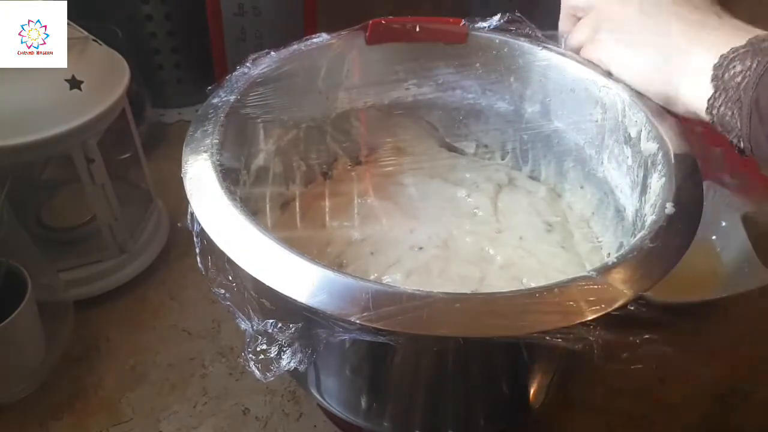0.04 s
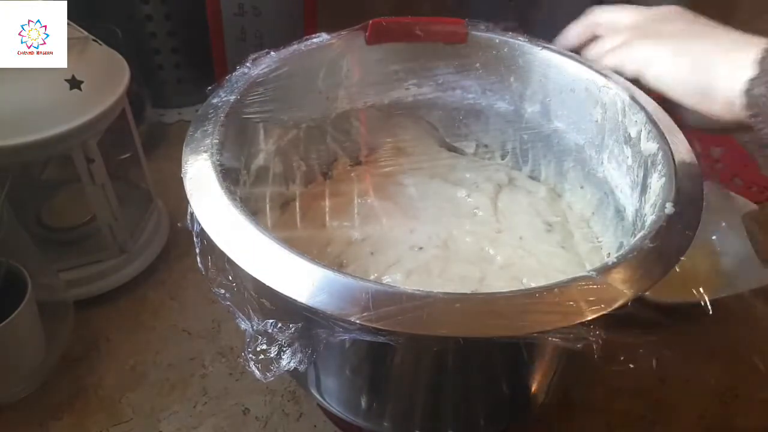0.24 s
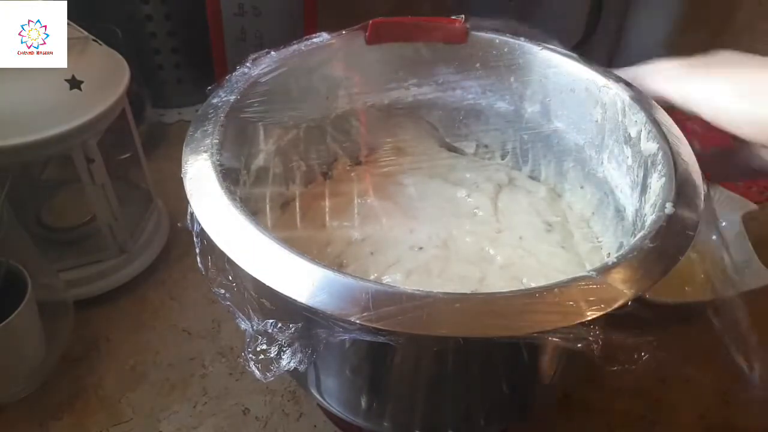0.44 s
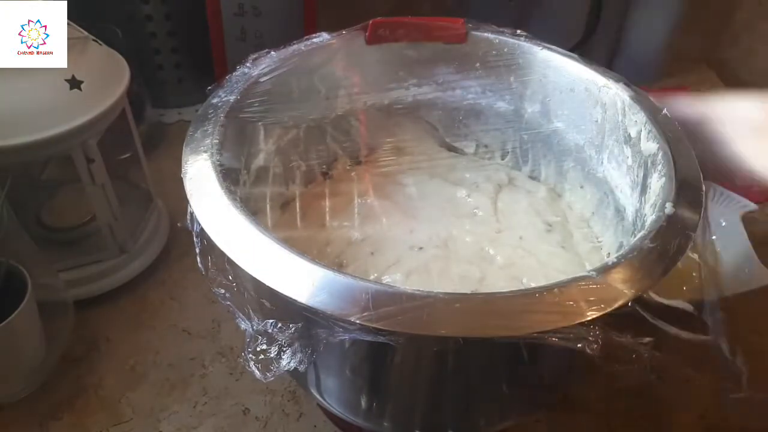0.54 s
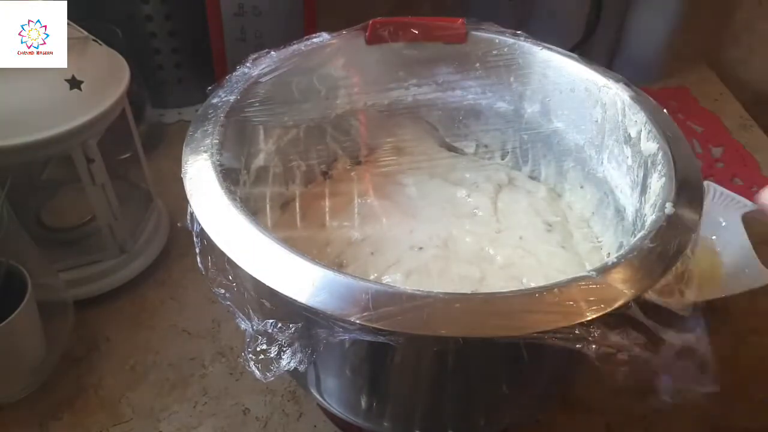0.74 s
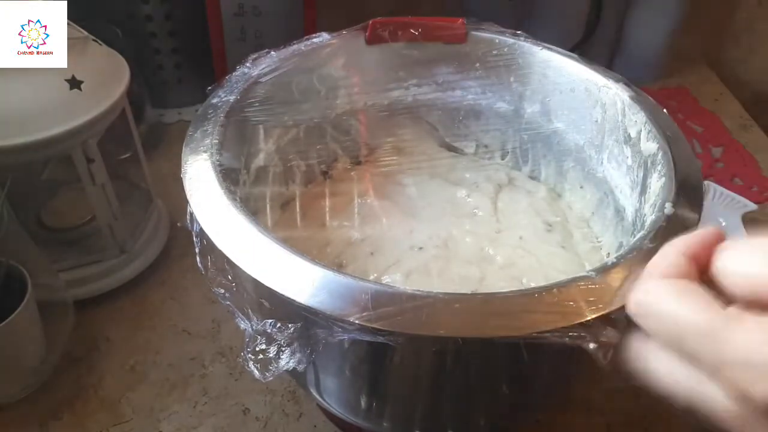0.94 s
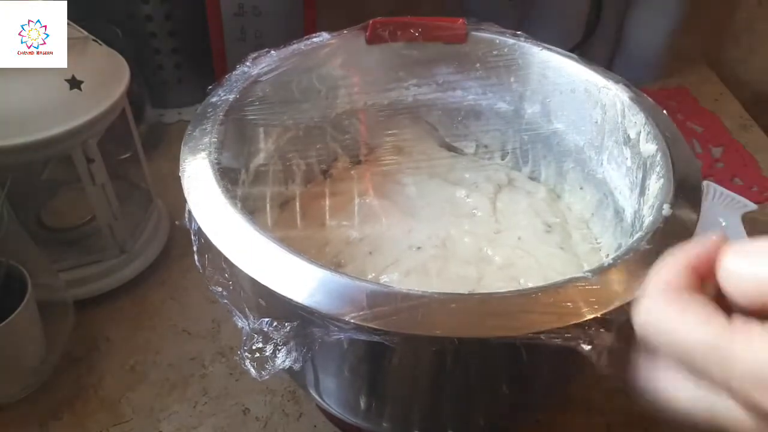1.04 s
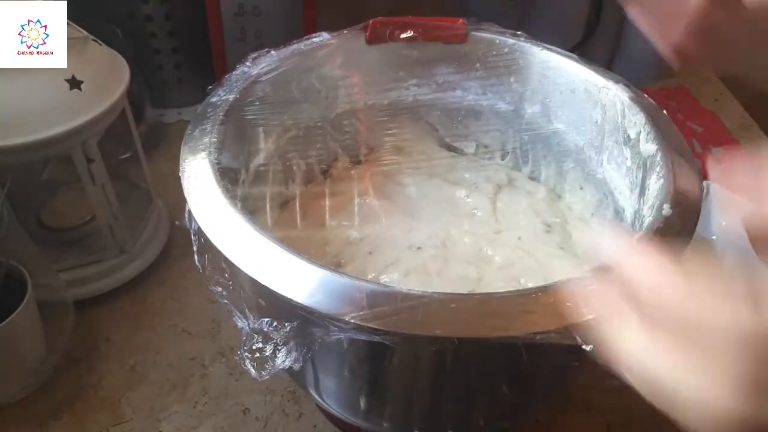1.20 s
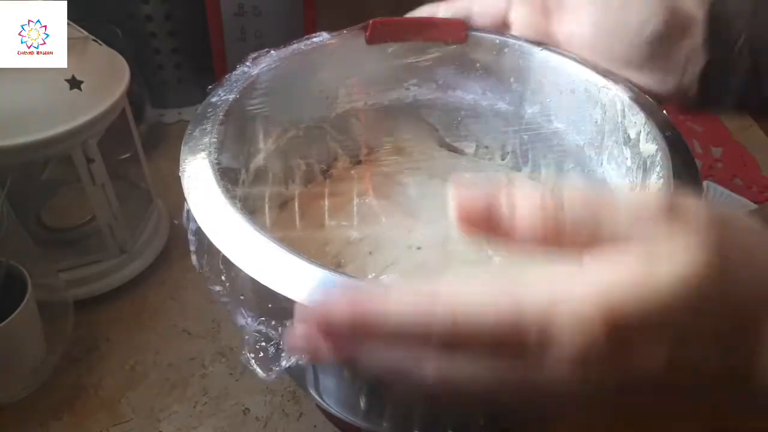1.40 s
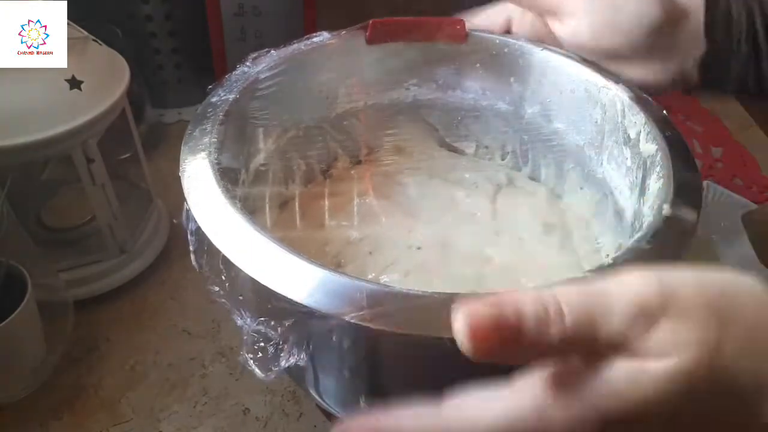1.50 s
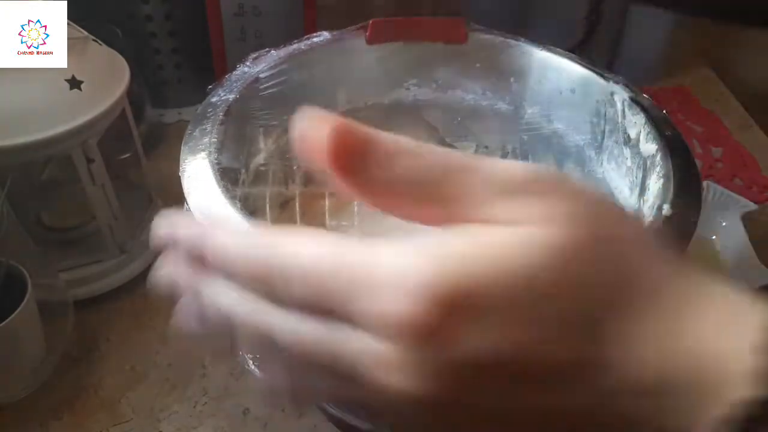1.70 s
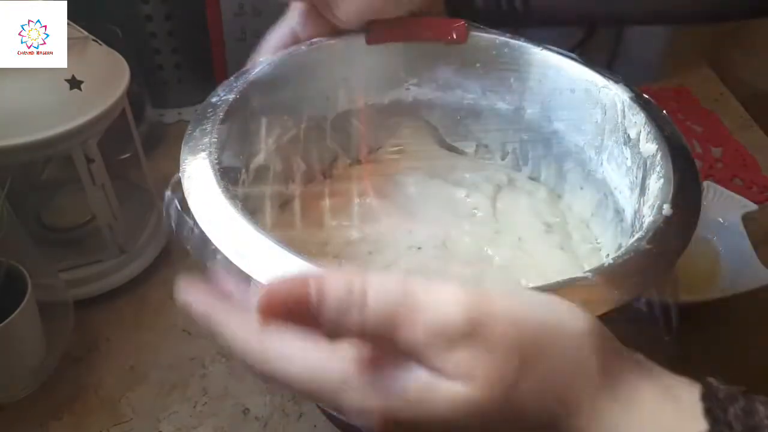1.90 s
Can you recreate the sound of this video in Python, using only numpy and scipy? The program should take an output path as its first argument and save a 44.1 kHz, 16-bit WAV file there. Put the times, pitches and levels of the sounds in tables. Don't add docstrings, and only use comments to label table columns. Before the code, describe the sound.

Close phone recording of plastic wrap being pressed over a metal bowl: crinkling strokes, an early thudding boom, clattery knocks, light taps, then brighter rustles and short rim squeaks, slight room echo, low distant hum.

```python
import sys
import numpy as np
from scipy import signal
from scipy.fft import rfft, irfft, next_fast_len
from scipy.io import wavfile
from scipy.ndimage import map_coordinates

SR = 44100
rng = np.random.default_rng(int(sys.argv[2]) if len(sys.argv) > 2 else 0)


def makeup_ratio(level_db):
    decades = np.asarray(level_db, float) / 20
    return 10 ** decades


def log_audio(samples):
    frames = np.atleast_2d(samples).T
    limited = np.clip(frames, -1, 1)
    pcm = np.round(limited * 32767).astype(np.int16)
    wavfile.write(sys.argv[1], SR, pcm)


N = 85995
T = np.arange(N) / SR
ON_RIM_S, OFF_RIM_DB = 0.69, -20
KNOCK_PAN_DB = -2.5


def unit(x):
    return x / np.sqrt(np.mean(x ** 2) + 1e-20)


def along(points, hz):
    f, v = np.transpose(points)
    return np.interp(np.log(hz + 1), np.log(f + 1), v)


def curves(rows):
    s, *columns = np.transpose(rows)
    return [np.interp(T, s, column) for column in columns]


def wobble(rate_hz):
    knots = rng.standard_normal(int(N * rate_hz / SR) + 4)
    return map_coordinates(knots, [T * rate_hz])


def filtered(x, response):
    m = next_fast_len(N + SR // 2)
    return irfft(rfft(x, m) * response(np.fft.rfftfreq(m, 1 / SR)), m)[..., :N]


def coloured(x, spectrum):
    return unit(filtered(x, lambda hz: makeup_ratio(along(spectrum, hz))))


def modes(x, table):
    t = T[:SR // 2]
    ring = np.zeros(len(t))
    for k, (hz, db, t60) in enumerate(table):
        ring += (-1) ** k * makeup_ratio(db - 60 * t / t60) * np.sin(2 * np.pi * hz * t)
    return signal.fftconvolve(x, ring)[:N]


def pair(alike):
    a, b = rng.standard_normal((2, N))
    angle = np.arccos(np.clip(alike, 0, 1)) / 2
    common, side = np.cos(angle) * a, np.sin(angle) * b
    return np.array([common + side, common - side])


def pan(db):
    return makeup_ratio(np.multiply.outer([.5, -.5], np.atleast_1d(db)))


def dying(t, t60, rise_s):
    return makeup_ratio(-60 * t / t60) * (1 - np.exp(-np.abs(t) / rise_s))


def place(rows, shape, before=0):
    lead, margin = round(before * SR), SR // 2
    out = np.zeros((2, N + SR))
    t = np.arange(-lead, round(.3 * SR)) / SR
    for s, *row in rows:
        at = int(s * SR)
        first = at + margin - lead
        out[:, first:][:, :len(t)] += shape(t + at / SR - s, *row)
    return out[:, margin:margin + N]


# time in seconds, pitch in Hz, level in dB.
DRONE_TRACK = [(0, 54, -57.5), (.6, 60.15, -66), (.72, 60.7, -48.5), (1.27, 64.55, -46.5),
               (1.39, 64.4, -59.5), (1.7, 65.3, -64), (1.8, 67.8, -56), (1.95, 66, -57.5)]
# frequency in Hz, density in dB per Hz.
AIR_SPECTRUM = [(15, -61), (25, -63), (45, -2), (70, -6), (137, -1), (373, -26.5), (591, -24),
                (14800, -47.5), (16000, -54)]


def background():
    hz, db = curves(DRONE_TRACK)
    phase = 2 * np.pi * np.cumsum(hz + 1.4 * wobble(9.97)) / SR
    drone = makeup_ratio(db + 6.0 + 2.0 * wobble(12)) * np.sin(phase)
    air = filtered(pair(0.94), lambda f: f < 400) + filtered(pair(0.058), lambda f: f >= 400)
    air_db = -57 + 0.5 * wobble(2.59)
    return drone * pan(-1.6) + makeup_ratio(air_db) * coloured(air, AIR_SPECTRUM)


# frequency in Hz, t60 in seconds.
ROOM_DECAY = [(200, 0.4), (1700, 0.24), (10000, 0.34)]


def kitchen(x):
    hz, t, z = signal.stft(pair(0.46)[:, :SR // 2], SR, nperseg=256)
    decay = makeup_ratio(-60 * t / along(ROOM_DECAY, hz)[:, None])
    tail = signal.istft(z * decay, SR, nperseg=256)[1]
    delayed = np.pad(x, (300, 0))[None]
    return signal.fftconvolve(delayed, tail / np.linalg.norm(tail[0]), axes=1)[:, :N]


# start in seconds, swell in seconds, hold in seconds, hiss in dB, skin drag in dB.
HAND_STROKES = [(-.03, 0.015, 0.067, -54, -41.5), (.035, 0.048, 0.033, -49, -36),
                (.30, 0.0095, 0.018, -57, -65), (.335, 0.013, 0.023, -49, -43.5),
                (.38, 0.012, 0.057, -65, -62), (.48, 0.012, 0.12, -60.5, -61.5),
                (.575, 0.033, 0.061, -55, -60), (.978, 0.0028, 0.0094, -79, -58.5),
                (.988, 0.011, 0.023, -39.5, -39.5), (1.045, 0.0043, 0.0056, -53.5, -46),
                (1.07, 0.019, 0.086, -70, -54), (1.160, 0.0065, 0.028, -42.5, -56),
                (1.405, 0.029, 0.0093, -55.5, -50.5), (1.455, 0.0076, 0.032, -50.5, -47.5),
                (1.50, 0.012, 0.065, -56, -49.5), (1.835, 0.027, 0.052, -50, -49.5),
                (1.89, 0.022, 0.057, -43, -45)]


def rub():
    swell_db, release_t60 = 18.5, 0.083

    def stroke(t, swell_s, hold_s, *db):
        rise = swell_db * np.maximum(1 - t / swell_s, 0)
        release = 60 * np.maximum(t - swell_s - hold_s, 0) / release_t60
        return makeup_ratio(np.reshape(db, (2, 1)) - rise - release)

    return place(HAND_STROKES, stroke)


# time in seconds, peak in dB, pitch in Hz, swell in ms.
AIR_BOOMS = [
    (.2193, -9.5, 293.7, 5),
    (.266, -25.5, 292.4, 12),
    (.283, -29, 286, 5),
    (.243, -27, 432, 4),
    (.787, -34, 515, 6),
    (.145, -42, 510, 7),
]


def booms():
    def boom(t, db, hz, ms):
        return makeup_ratio(db - 4.1 * (t / (ms / 1000)) ** 2) * np.cos(2 * np.pi * hz * t)

    return place(AIR_BOOMS, boom, before=.04) * pan(KNOCK_PAN_DB)


# time in seconds, peak in dB, contact in ms, clatter over it in dB.
BOWL_KNOCKS = [(.133, -41, 0.4, 11), (.2045, -20.5, .8, 12.5), (.2082, -14, 0.43, -4.5),
               (.2151, -23, 0.85, 9.5), (.256, -31, 2.1, 13), (.299, -28.5, 3.5, 5.5),
               (.42, -31.5, 3.5, -7), (1.116, -31, 2.9, -4), (1.468, -27, 7.5, -7), (.470, -18.5, 1.42, 5),
               (.4735, -22, 1.88, 2.5), (.527, -21, 1.28, 6.5), (.556, -25, 2.04, -9),
               (1.481, -31.5, 1.57, 1.5)]
# time in seconds, peak in dB, contact in ms, clatter over it in dB.
FINGER_TAPS = [
    (0.78, -29, 0.2, 14),
    (.791, -28, 1, -6),
    (0.81, -35.5, 1, -6),
    (.836, -43, 0.99, 12),
    (0.996, -36.5, 0.47, 6),
    (1.1136, -28.5, 0.76, -1.5),
    (1.903, -38.5, 0.87, -5),
]
# frequency in Hz, level in dB, t60 in seconds.
BODY_MODES = [(75.7, -20, 0.85), (116, -12.5, 0.33), (175.2, -18.5, 0.38), (197, -18.5, 0.37),
              (283, -17, 0.086), (303.7, 8, 0.05), (420.7, -11.5, 0.29), (513, -9, 0.068),
              (640, -12.5, 0.022), (709, -12, 0.069), (975, -39, 0.099)]
# frequency in Hz, density in dB per Hz.
CLATTER_SPECTRUM = [(150, -14), (300, 0), (550, -6.5), (1000, -14), (2200, -23.5), (3500, -35.5),
                    (7000, -56), (16000, -46)]


def knocks(drag):
    clatter_db, clatter_t60, press_db = -19, 0.14, -26.5

    def knock(t, db, ms, _):
        half_s = ms / 2000
        return makeup_ratio(db) * np.exp(-(t / half_s) ** 2) / (half_s * SR)

    def tap(t, db, ms, over_db):
        return knock(t, db, ms, over_db) * t / (ms / 4000)

    def shake(t, db, ms, over_db):
        return makeup_ratio(db + over_db + clatter_db) * dying(t, clatter_t60, 0.00056)

    push = place(BOWL_KNOCKS, knock, before=0.0055) + place(FINGER_TAPS, tap, before=.005)
    rumble = makeup_ratio(press_db + OFF_RIM_DB * (T < ON_RIM_S)) * drag * rng.standard_normal(N)
    body = makeup_ratio(-6) * modes(push[0] + rumble, BODY_MODES) * pan(KNOCK_PAN_DB)
    clatter = place(BOWL_KNOCKS + FINGER_TAPS, shake) * coloured(pair(0.12), CLATTER_SPECTRUM)
    return body + clatter


# time in seconds, peak in dB, pitch in Hz, swell in ms.
RIM_FLICKS = [(1.003, -36, 2920, 3.9), (1.019, -28, 1834, 3), (1.030, -32.5, 1680, 3.2),
              (1.054, -34, 1850, 2.8), (1.055, -37.5, 2820, 3.5), (1.058, -41, 840, 6.1),
              (1.165, -31, 2900, 1.4), (1.178, -34.5, 2524, 8.7), (1.191, -27, 1656, 2.3),
              (1.431, -42, 1629, 0.72), (1.447, -28, 1728, 1.5), (1.473, -29, 1700, 0.59),
              (1.517, -29, 1777, 2.4), (1.522, -27, 1720, 2.9), (1.546, -40.5, 1650, 2.2),
              (1.558, -29, 1780, 2), (1.5665, -21, 1740, 2.4), (1.573, -34, 1700, 2.3),
              (1.857, -43.5, 1758, 5), (1.882, -36, 1766, 3), (1.201, -38, 1687, 7),
              (1.938, -52, 1720, 2.1), (1.013, -31.5, 2100, 2.2), (1.535, -36, 1870, 6.1),
              (1.913, -33, 2850, 0.76)]
# frequency in Hz, level in dB, t60 in seconds.
RIM_MODES = [(1579, -12, 0.25), (1677, -1, 0.05), (1755, 0, 0.09), (1850, -5, 0.05), (1945, -3, 0.045),
             (2088, -11, 0.12), (2630, -16, 0.05), (840, -29, .1)]


def rim(drag):
    fall_per_s, roughness = 3.63, 0.61
    ring_db, rub_ring_db = -8, -3

    def flick(t, db, hz, ms):
        swell = makeup_ratio(db) * np.exp(-.5 * (t / (ms / 1000)) ** 2)
        return swell * np.sin(2 * np.pi * hz * t * (1 - fall_per_s * t))

    squeak = place(RIM_FLICKS, flick, before=.03)
    squeak = squeak * (1 + roughness * np.array([wobble(500), wobble(500)]))
    hum_db = rub_ring_db + OFF_RIM_DB * (T < ON_RIM_S) + 0.58 * wobble(88)
    hum = drag * makeup_ratio(hum_db) * rng.standard_normal(N) / 25
    ring = makeup_ratio(ring_db) * modes(squeak[0], RIM_MODES) / 130 + modes(hum, RIM_MODES)
    return (squeak + ring) * pan(-1.5 + 3.6 * wobble(14.95))


# time in seconds, peak in dB, left-right in dB, pitch factor.
CREASE_TICKS = [(.0030, -32, 2, 1), (.0115, -36, 2, 1), (.0193, -30, 2, 1), (.0240, -33, 2, 1),
                (.0725, -33, 2, .85), (.0895, -32, 2, .85), (.0970, -33, 2, .9), (.1000, -32, 2, .9),
                (.1055, -33, 2, .95), (.1316, -28, 3, 1), (.3426, -45, 3, 1), (.3601, -36, 3, 1),
                (.5267, -45, 3, 1), (.5896, -48, 3, 1), (.6135, -44, 3, 1), (.7815, -36, 0, .67),
                (.7832, -35, 0, .67), (.9788, -52, 3, 1), (.9968, -34, 4, 1), (1.0025, -32, 3, 1),
                (1.0130, -32, 2, 1), (1.0172, -32, 2, 1), (1.1275, -48, 4, 1), (1.1664, -38, 4, 1.2),
                (1.1820, -36, 4, 1.2), (1.1888, -34, 3, 1.2), (1.4627, -42, 4, 1), (1.5201, -44, 5, 1),
                (1.8518, -42, 9, 1), (1.9087, -35, 5, 1), (1.9110, -35, 5, 1), (1.9155, -36, 5, 1),
                (1.9190, -35, 5, 1), (1.9235, -38, 5, 1), (1.9310, -36, 5, 1)]
# frequency in Hz, level in dB, t60 in seconds.
SHEET_MODES = [(1850, 0, .014), (3100, -3, .012), (4250, -5, .01), (6900, -10, .005), (8200, -11, .005),
               (12500, -12, .003)]
# time in seconds, peak in dB, pitch in Hz, t60 in seconds,
# share of pitch lost a second.
FILM_SLIPS = [
    (1.8695, -33, 4050, .028, 14),
    (1.880, -45, 3300, .05, 9),
    (1.1625, -36, 3000, .03, 6),
    (1.169, -38, 2650, .08, 4),
    (1.011, -38, 2400, .04, 5),
]


def sheet(drag):
    slack_dull_db = 14
    tick_db, breath_db, slip_rise_s = -6, -22.5, 0.0006
    overtones_db = [0, -11, -14, -22]

    def tick(t, db, side_db, factor):
        slack = max(1 - factor, 0)
        ring = 0
        for i, (hz, mode_db, t60) in enumerate(SHEET_MODES):
            tone = np.sin(2 * np.pi * hz * factor * t)
            ring = ring + makeup_ratio(mode_db - slack_dull_db * i * slack) * dying(t, t60, 0.0001) * tone
        return makeup_ratio(db + tick_db) * pan(side_db) * ring

    def slip(t, db, hz, t60, fall):
        phase = 2 * np.pi * hz * t / (1 + fall * t / 2)
        whistle = sum(makeup_ratio(level) * np.sin((k + 1) * phase) for k, level in enumerate(overtones_db))
        return makeup_ratio(db) * dying(t, t60, slip_rise_s) * whistle

    slips = place(FILM_SLIPS, slip) * makeup_ratio(4 * wobble(300)) * pan(5)
    breath = np.array([modes(side, SHEET_MODES[:3]) for side in drag * pair(0.17)])
    return place(CREASE_TICKS, tick) + slips + makeup_ratio(breath_db) * breath


def creases(centre_hz, rise_per_s):
    per_s, spread, cycles = 1200, 0.607, 4.9
    r = rng.standard_normal((int(per_s * 2), 3))
    at = rng.integers(0, N, len(r))[:, None] + np.arange(400)
    t = T[:400]
    hz = np.clip(centre_hz * np.exp(spread * r[:, :1]), 400, 12000)
    u = t * hz / cycles
    tone = makeup_ratio(3.1 * r[:, 1:2]) * u * np.exp(-3 * u) * np.sin(2 * np.pi * hz * t * (1 + rise_per_s * t))
    sides = []
    for sign in (1, -1):
        heard = tone * np.sqrt(1 + sign * np.tanh(r[:, 2:]))
        sides.append(np.bincount(at.ravel(), heard.ravel(), N + 400)[:N])
    return unit(np.array(sides))


# frequency in Hz, density in dB per Hz.
SKIN_SPECTRUM = [(150, -48), (250, -19), (426, 1.5), (617, 8), (715, -8.5), (1450, 0.5), (6000, -22),
                 (7800, -41), (13200, -120)]


def skin(drag):
    echo_ms, shrink_per_s, echo_share = 2.13, 6.4, 0.49
    rubbing = coloured(pair(0.38), SKIN_SPECTRUM) * pan(-2.8)
    rubbing = rubbing + makeup_ratio(-4) * creases(2003, 8.2) * pan(3.2)
    late = T - echo_ms / 1000 * np.exp(-shrink_per_s * T)
    echo = np.array([np.interp(late, T, side) for side in rubbing]) * (T < ON_RIM_S)
    return drag * makeup_ratio(1.6 * wobble(69.97) - 3.5) * (rubbing + echo_share * echo)


# frequency in Hz, density in dB per Hz.
FILM_SPECTRUM = [(1200, -30), (2500, -3.5), (4200, -8.5), (5800, -14), (7500, -10), (9500, -15.5),
                 (14500, -9.5)]
# time in seconds, peak in dB, left-right in dB.
FILM_SNAPS = [
    (0.1312, -31.5, 2),
    (0.2033, -29.5, 10.5),
    (0.4703, -43.5, 5),
    (0.7814, -62, -3),
    (1.126, -47, 12),
    (1.5608, -46.5, 12),
]


def film(press):
    grains_per_s, spread_db, grain_db, fold_db = 2100, 16, -11, -12.5
    snap_db, snap_t60 = -4, 0.044
    grain_level = makeup_ratio(spread_db * np.minimum(rng.exponential(size=N), 2.3))
    grains = (rng.random(N) < grains_per_s / SR) * grain_level * rng.choice([-1, 1], N)
    grains = unit(np.array([grains, np.roll(grains, round(.00012 * SR))]))
    hiss = coloured(pair(0.037) + makeup_ratio(grain_db) * grains, FILM_SPECTRUM)
    hiss = hiss + makeup_ratio(fold_db) * creases(4930, -8)

    def snap(t, db, side_db):
        return makeup_ratio(db + snap_db) * pan(side_db) * dying(t, snap_t60, 0.00036)

    level = press * makeup_ratio(3.4 * wobble(90)) * pan(5.5 + 1.5 * wobble(10.2))
    return (level + place(FILM_SNAPS, snap)) * hiss


def scene():
    press, drag = rub()
    near = booms() + knocks(drag) + rim(drag) + sheet(drag) + skin(drag) + film(press)
    wet_db = -9
    return background() + makeup_ratio(wet_db) * kitchen(near.mean(axis=0)) + near


def low_pass(x):
    return signal.sosfilt(signal.butter(12, 16470, fs=SR, output="sos"), x)


def record(dry):
    low_cut_hz, top_hz = 46, 15700

    def phone(hz):
        low_cut = (1j * hz / (low_cut_hz + 1j * hz)) ** 3
        return low_cut / (1 + (hz / top_hz) ** 60)

    return low_pass(filtered(dry, phone))


dry = scene()
out = record(dry)
log_audio(out)
```